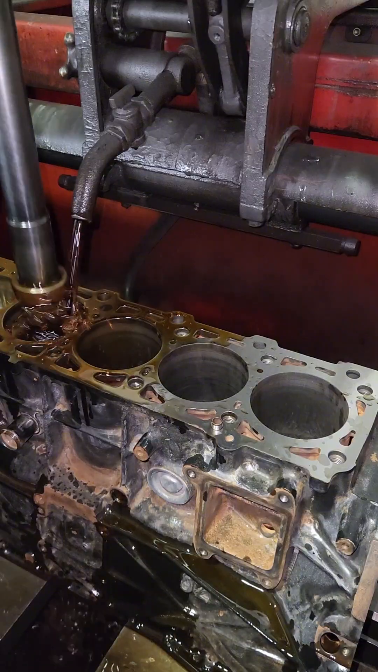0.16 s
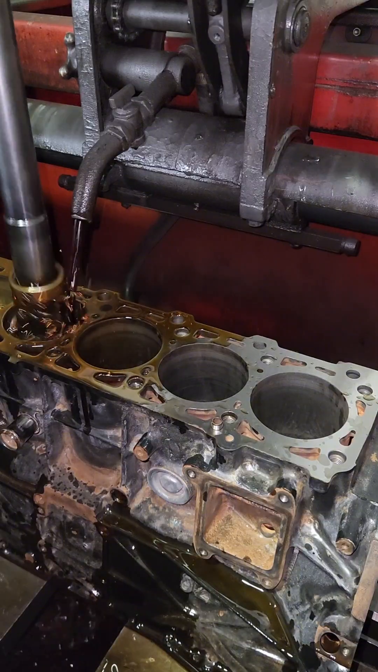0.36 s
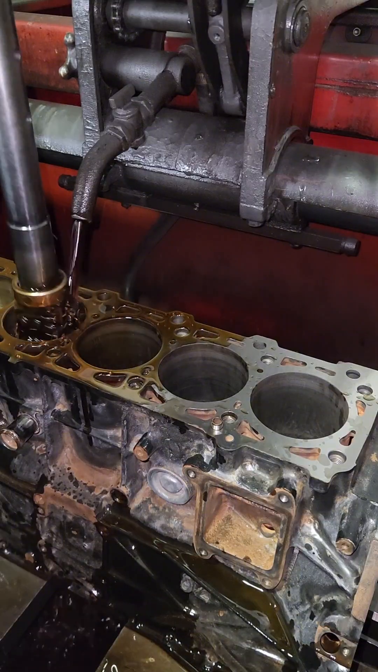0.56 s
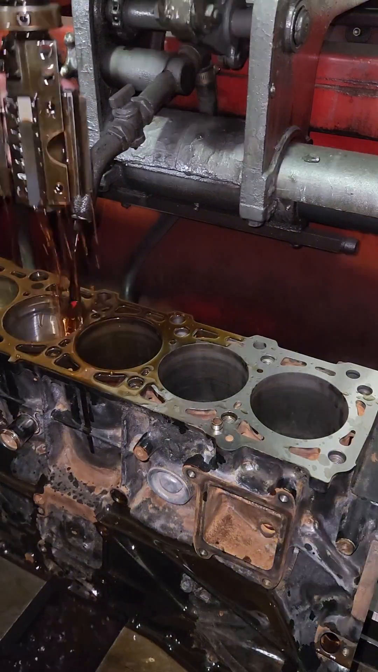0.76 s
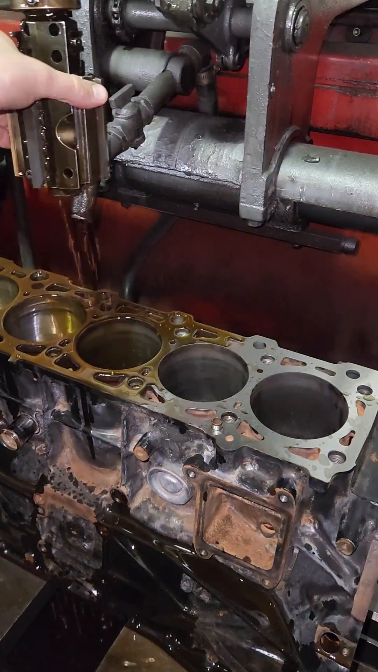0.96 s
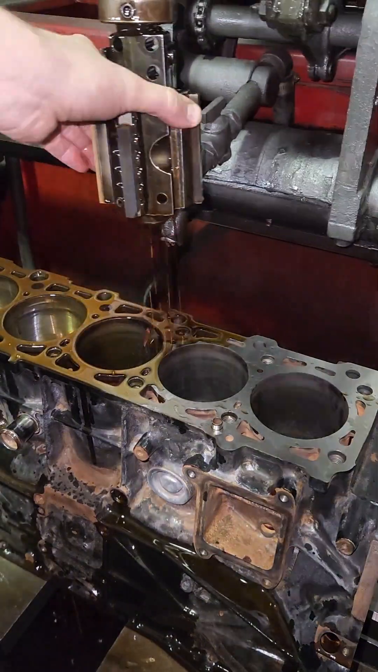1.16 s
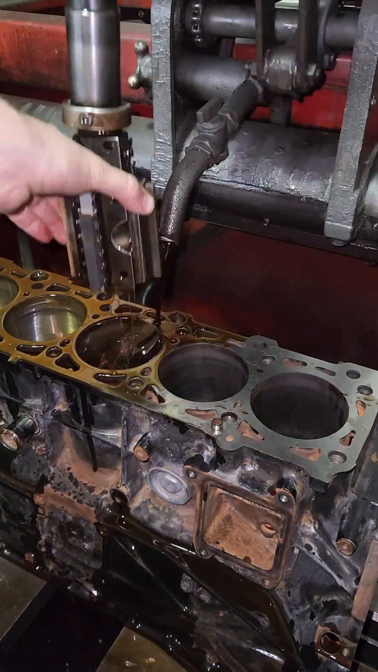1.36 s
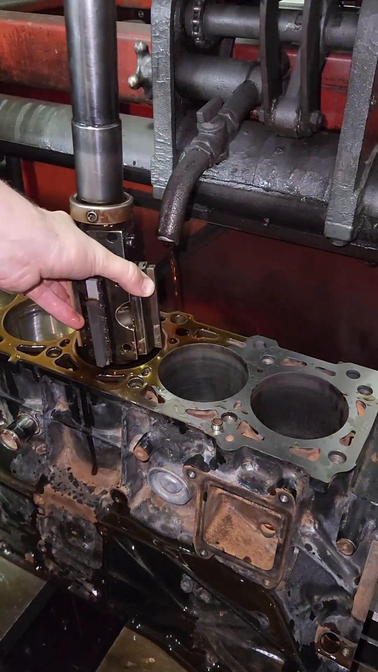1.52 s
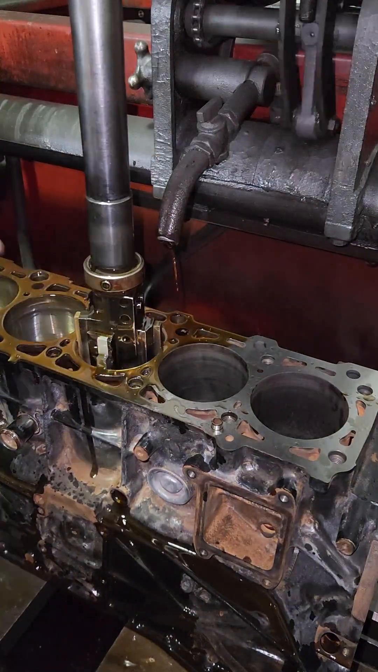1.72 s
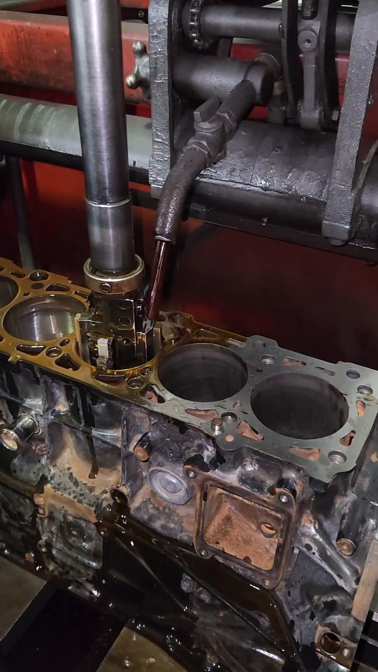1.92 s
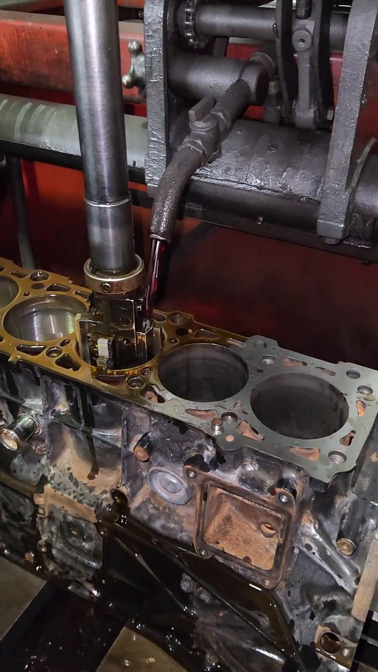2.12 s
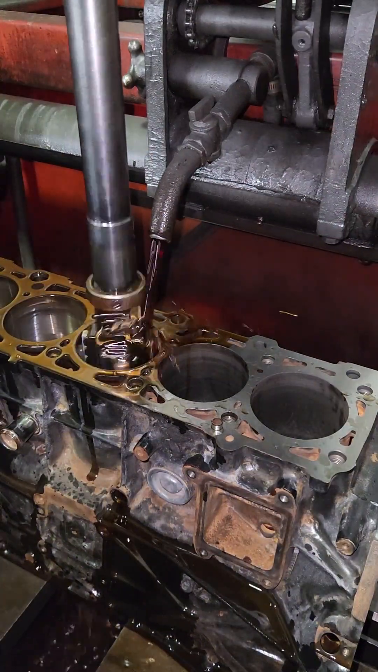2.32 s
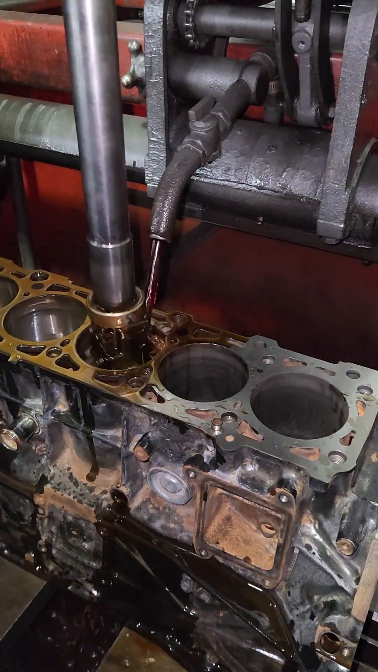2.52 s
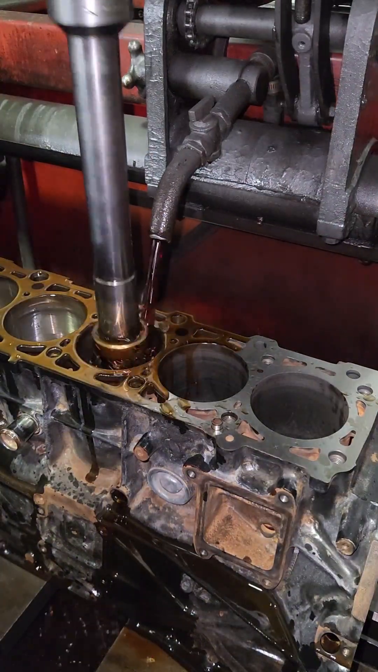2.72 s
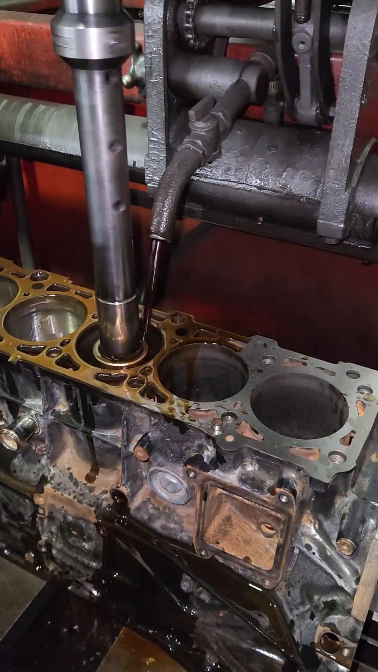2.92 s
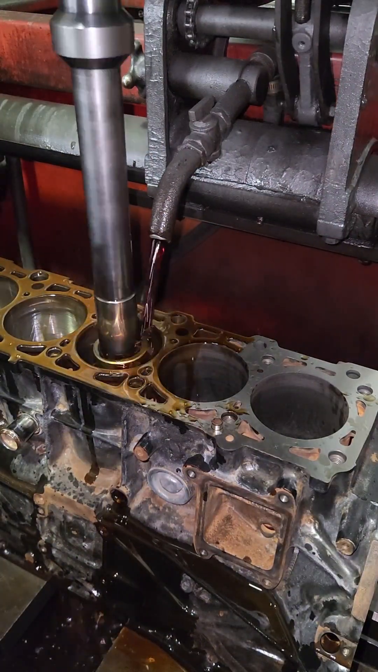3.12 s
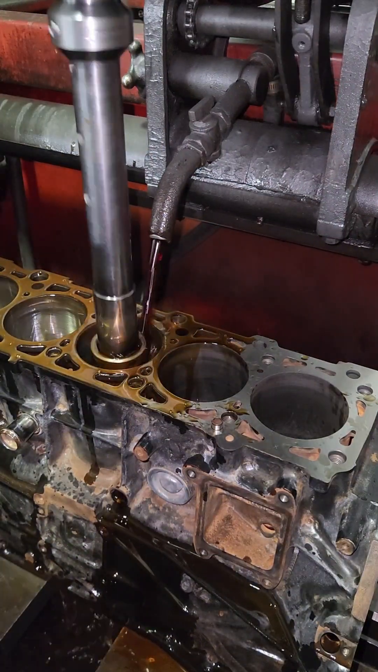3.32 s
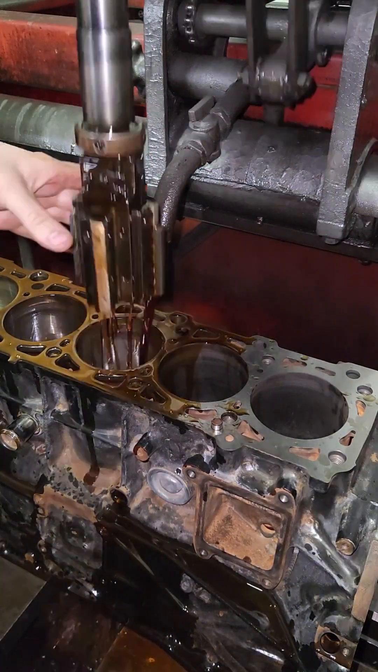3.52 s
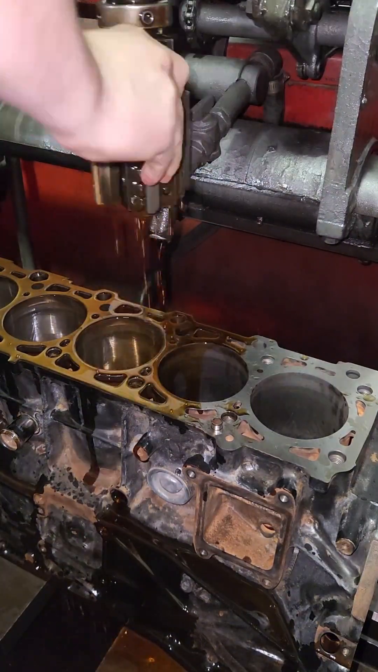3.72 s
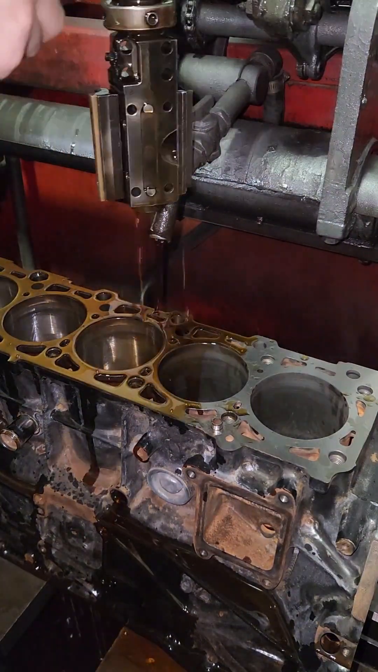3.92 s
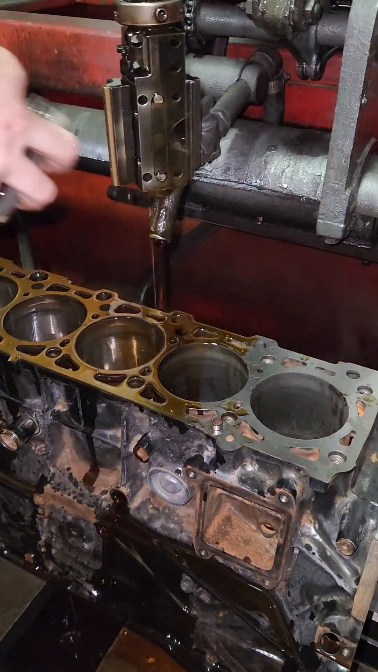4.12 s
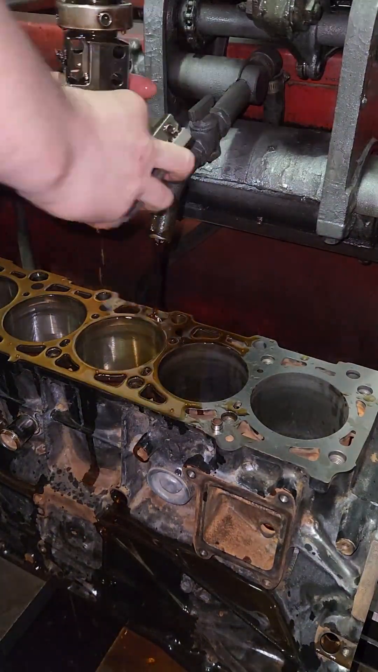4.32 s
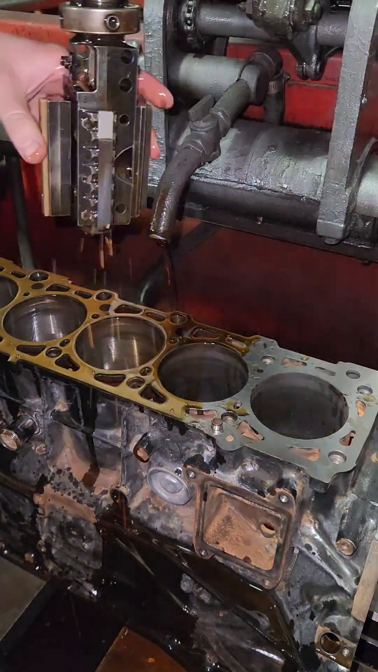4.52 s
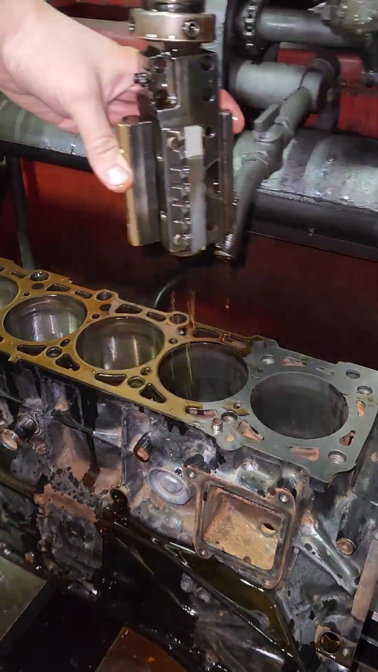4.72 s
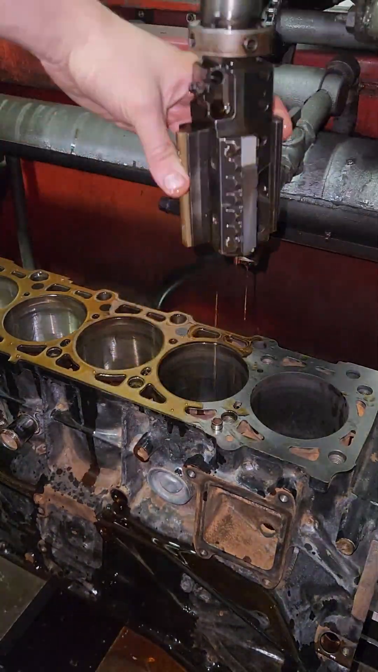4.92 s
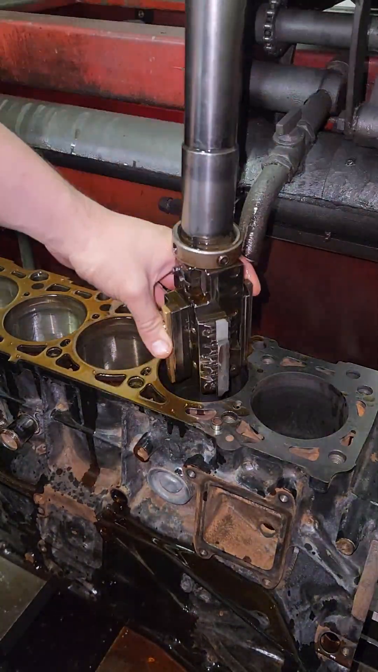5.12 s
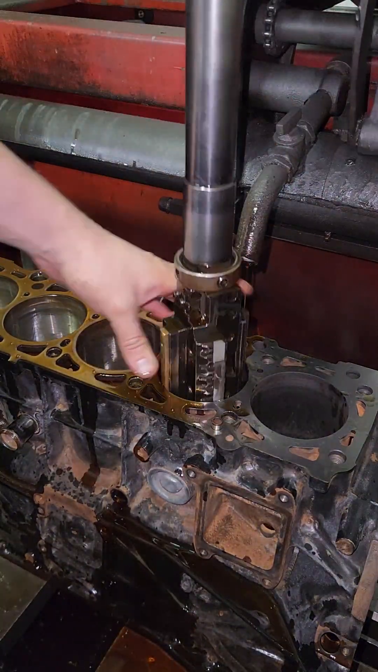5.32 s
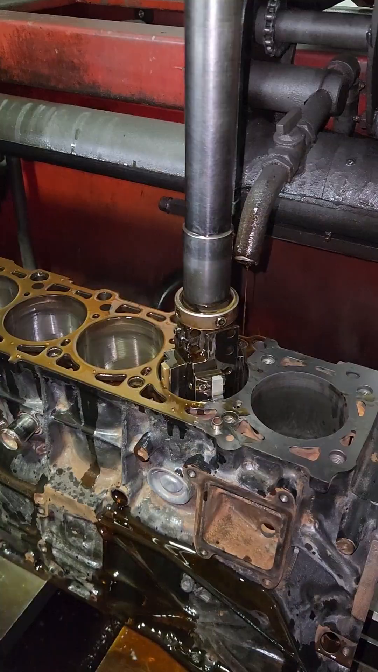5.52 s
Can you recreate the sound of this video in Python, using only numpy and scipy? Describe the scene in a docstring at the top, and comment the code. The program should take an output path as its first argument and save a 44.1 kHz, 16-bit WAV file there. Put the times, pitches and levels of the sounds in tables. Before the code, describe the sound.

A honing machine rasps and whines in short strokes on an engine block, coasts down over pattering oil, with steel knocks and clutch thumps between spells.

```python
"""A cylinder honing machine works an engine block in short spells, close by in a machine shop.
It starts in mid-spell: the frame rumbles, motor and gears whine as tones, noisy stones rub and scuff in strokes.
The clutch lets go and the drive coasts down over pattering oil; the loose hone head clicks and knocks as modes
and noise bursts, and the carriage whirrs as a hand shoves it to the next bore. The clutch thumps in, the stones
bite and squeak, the drive coasts again, more shoves and knocks follow, and the clutch grabs once more."""
import sys
import numpy as np
from scipy import signal
from scipy.fft import rfft, irfft
from scipy.io import wavfile

SR = 44100
rng = np.random.default_rng(int(sys.argv[2]) if len(sys.argv) > 2 else 0)


def digitize_waveform(pressure):
    """Quantize a signal to 16-bit integers and store it at the path in sys.argv[1].

    Rows of a 2-D input are taken as channels; values are limited to [-1, 1].
    """
    field = np.atleast_2d(pressure).T
    bounded = np.clip(field, -1, 1)
    quanta = np.round(bounded * 32767).astype(np.int16)
    wavfile.write(sys.argv[1], SR, quanta)


N = 245195
T = np.arange(N) / SR

# How much louder the left microphone port is. Each row: frequency in Hz, left minus right in dB.
PORT_SIDES = [(100, 1.76), (400, 3.1), (1300, 3), (2400, 1.2), (4600, 2.1), (6500, 11.2), (9000, 16.5),
              (12500, 10.6), (15500, 13)]
# A hand shoves the spindle along to the next bore.
# Each row: middle in seconds, half length in seconds, frame rumble in dB, whirr in dB.
SPINDLE_SHOVES = [(1.387, 0.092, -50, -46.5), (1.57, 0.071, -36.5, -49), (4.704, 0.044, -32, -70)]


def amp(db):
    """Decibels to gain."""
    return 10 ** (np.asarray(db) / 20)


def unit(x):
    """Scales to rms 1; a pair is scaled by its mid signal."""
    return x / np.sqrt(np.mean(np.atleast_2d(x).mean(0) ** 2) + 1e-20)


def read(points, hz):
    """Reads a spectrum on a log-frequency axis."""
    f, value = np.transpose(points)
    return np.interp(np.log(hz + 1), np.log(f + 1), value)


def add(mix, s, sound):
    """Mixes a sound in at second s."""
    part = mix[:, max(round(s * SR), 0):][:, :sound.shape[-1]]
    part += sound[..., :part.shape[1]]


def drift(rate_hz):
    """Smooth chance of rms 1, moving up to about the given rate."""
    hz = np.fft.rfftfreq(N, 1 / SR)
    slow = np.exp(-(hz / rate_hz) ** 2) * (hz > 0)
    return unit(irfft(rfft(rng.standard_normal(N)) * slow, N))


def swell(middle_s, half_s):
    """A smooth rise and fall around one moment."""
    return np.exp(-((T - middle_s) / half_s) ** 2)


def hump(centre_hz, octaves, skirt_db):
    """A spectrum with one rounded peak over a flat skirt."""
    hz = np.geomspace(30, 17000, 60)
    bell = np.exp(-.5 * (np.log2(hz / centre_hz) / octaves) ** 2)
    return np.column_stack([hz, 20 * np.log10(bell + amp(skirt_db))])


def ports(pair, colour):
    """Colours two unrelated signals and spreads them over the ports: bass alike, treble mostly left."""
    # Likeness of the two ports. Each row: frequency in Hz, likeness (held to 0-1 below).
    port_likeness = [(100, 1.5), (300, 0.83), (600, 1), (1200, -0.7), (2400, 0.11), (15000, -0.9)]
    size = pair.shape[1]
    hz = np.fft.rfftfreq(size, 1 / SR)
    a, b = rfft(pair)
    same = np.clip(read(port_likeness, hz), 0, 1)
    right = amp(-read(PORT_SIDES, hz))
    spread = np.array([a, right * (same * a + np.sqrt(1 - same ** 2) * b)])
    mid_gain = np.sqrt(1 + right ** 2 + 2 * same * right)
    return unit(irfft(spread * amp(read(colour, hz)) / mid_gain, size))


def noise(colour, size=N):
    """Coloured noise at both ports."""
    return ports(rng.standard_normal((2, size)), colour)


def grains(per_s, spread_db):
    """Sparse tiny impacts of uneven size."""
    size = amp(spread_db * np.minimum(rng.exponential(1, N), 4))
    landed = rng.random(N) < per_s / SR
    return unit(size * landed * rng.standard_normal((2, N)))


def burst(colour, rise, t60, size=8192):
    """Noise that swells quickly and dies away, its envelope peaking at 1; times in seconds."""
    t = T[:size]
    shape = (1 - np.exp(-t / rise)) * amp(-60 * t / t60)
    return noise(colour, size=size) * shape / shape.max()


def tone(hz, rough, width_hz, lead):
    """A machine line: a clean core with a fuzzy skirt; the left port leads by some radians."""
    rough = np.clip(rough, 0, 1)
    turn = np.exp(2j * np.pi * np.cumsum(hz) / SR)
    fuzz = (drift(width_hz) + 1j * drift(width_hz)) / np.sqrt(2)
    line = turn * (np.sqrt(1 - rough) + np.sqrt(rough) * fuzz)
    right = line * np.exp(-1j * lead) * amp(-read(PORT_SIDES, hz.max()))
    return unit(np.array([line, right]).real)


def spell():
    """At each moment: seconds since clutch in, stones' bite and clutch out; then the hum and whine levels."""
    # Spells of work. Each row: clutch in, stones bite and clutch out in seconds,
    # then motor hum, 4th and 5th tooth harmonic in dB before each source's own trim.
    work_spells = [(-1, -0.5, 0.645, -32.5, -30.7, -33.6), (1.812, 2.42, 3.45, -27.6, -38.3, -32),
                   (5.441, 6, 7, -30, -42, -41)]
    rows = np.array(work_spells)
    start, bite, stop, *levels = rows[np.searchsorted(rows[1:, 0], T)].T
    return (*np.maximum(T - np.array([start, bite, stop]), 0), *levels)


def running(rise_s, fade_db_per_s, hold_s=0):
    """An envelope that rises with the clutch, stays through the spell and fades after it."""
    engaged, _, released = spell()[:3]
    return (1 - np.exp(-engaged / rise_s)) * amp(-fade_db_per_s * np.maximum(released - hold_s, 0))


def speed():
    """Speed of the drive, 1 at work: it picks up quickly and sags once the clutch lets go."""
    slip, spin_up_s, coast_s = 0.14, 0.04, 0.7  # share of speed missing at the grip, two time constants
    engaged, _, released = spell()[:3]
    return (1 - slip * np.exp(-engaged / spin_up_s)) * np.exp(-released / coast_s)


def pressure():
    """How hard the stones press: 0 while loose, 1 once they bite, until the next clutch-in."""
    return 1 - np.exp(-spell()[1] / 0.011)


def frame():
    """The heavy frame drones at its resonance over a broad rumble, and keeps shaking as the drive coasts."""
    # Each row: frequency in Hz, relative level in dB per Hz.
    rumble_colour = [(10, -17), (25, -10.5), (45, -6), (62, -3), (82, -4.5), (102, -4), (130, -12),
                     (200, -22.5), (350, -28), (800, -43), (2000, -62)]
    shake_hz, shake_db, rest_db = 78.25, -20, -44.5
    drone_hz = shake_hz * (0.9 + 0.1 * speed() + 0.0819 * drift(10.12))
    drone = tone(drone_hz, rough=0.11, width_hz=24, lead=0)
    shaking = amp(-2) * drone + noise(rumble_colour)
    # the shaking is driven, so its strength stays steady from one moment to the next
    power = signal.fftconvolve(shaking[0] ** 2, signal.windows.hann(M=4001), "same")
    steady = unit(shaking / np.sqrt(power))
    driven = amp(shake_db) * running(rise_s=0.007, fade_db_per_s=26, hold_s=0.16)
    shoved = sum(amp(db) * swell(s, half_s) for s, half_s, db, _ in SPINDLE_SHOVES)
    return np.hypot(driven + shoved, amp(rest_db)) * amp(1.2 * drift(8.1)) * steady


def motor():
    """The loaded motor hums with an unsteady pitch, loudest just as the clutch grips."""
    hum_hz, surge_db, surge_s = 354.3, 8, 0.03  # the surge dies away with this time constant
    engaged, _, _, hum_db, _, _ = spell()
    db = hum_db - 0.3 + surge_db * np.exp(-engaged / surge_s) + 1.1 * drift(8)
    hz = hum_hz + 7 * drift(7) + 7 * drift(41.5)
    hum = tone(hz, rough=0.4, width_hz=78, lead=0.24)
    return amp(db) * running(rise_s=0.0052, fade_db_per_s=223) * hum


def gears():
    """Tooth harmonics whine and sag as the clutch lets go; backlash smears the fourth where it is weak."""
    mesh_hz = 329.8  # gear teeth meeting at full speed
    fourth_db, fifth_db = spell()[-2:]
    fourth_hz, fifth_hz, sixth_hz = np.outer([4, 5, 6], mesh_hz * speed())
    wobble = 1 + .0045 * drift(16.5)
    smear = np.interp(fourth_db, [-40, -33], [.95, .15])
    fourth = amp(fourth_db - 0.5) * tone(fourth_hz * wobble, rough=smear, width_hz=58, lead=0.97)
    # backlash rocks the phase of the fifth harmonic
    rocked_hz = fifth_hz * wobble + 12 * drift(67)
    fifth = amp(fifth_db) * tone(rocked_hz, rough=0.54, width_hz=116, lead=-0.94)
    sixth = amp(fifth_db - 15.5) * tone(sixth_hz * wobble, rough=0.86, width_hz=54, lead=0.35)
    # squaring doubles the fade rate in dB
    return running(rise_s=0.062, fade_db_per_s=69) ** 2 * (fourth + fifth + sixth)


def stones():
    """Grit rubs the oiled bore as noise and grains, harder once the stones bite; the level flutters."""
    # Each row: frequency in Hz, relative level in dB per Hz.
    rub_colour = [(60, -24), (150, 7), (300, 8.5), (470, 5.5), (720, 3.5), (1000, 0), (1450, 1),
                  (1900, -5.5), (3300, -8), (5000, -10), (7800, -12.5), (9400, -26.5), (12200, -13),
                  (15800, -18.5)]
    loose_db, pressed_db, tail_db = -31.5, -26.5, -40.5  # spinning loose, on the bore, drawn out
    grit = rng.standard_normal((2, N)) + 0.33 * grains(per_s=2000, spread_db=3.0)
    rub_level = amp(loose_db + (pressed_db - loose_db) * pressure())
    rub = rub_level * running(rise_s=0.0025, fade_db_per_s=123, hold_s=0.0095)
    tail = amp(tail_db) * running(rise_s=0.006, fade_db_per_s=30)
    return np.maximum(rub, tail) * amp(0.93 * drift(58)) * ports(grit, rub_colour)


def oil():
    """Oil patters in an uneven trickle, fuller while the head spins; the loose head also throws spray."""
    # Patter on the block. Each row: frequency in Hz, relative level in dB per Hz.
    wash_colour = [(60, -9), (130, -3), (280, -11), (450, -14), (700, -17.5), (1000, -18.5), (1300, -18.5),
                   (1900, -21.5), (2700, -19), (4200, -19.5), (7700, -28.5), (9400, -46), (11000, -39),
                   (12300, -33.5), (16000, -45)]
    # Fine spray off the spinning head. Each row: frequency in Hz, relative level in dB per Hz.
    spray_colour = [(200, 14), (700, 4), (2000, -9), (4200, -11), (7700, 1), (9400, -13), (12300, -6),
                    (16000, -5)]
    trickle_db, flow_db, spray_db = -47, -42.5, -37.5
    patter = rng.standard_normal((2, N)) + 0.38 * grains(per_s=400, spread_db=2.5)
    # after a spell the flow drains off the head
    flow = amp(trickle_db) + amp(flow_db) * running(rise_s=0.06, fade_db_per_s=10.5)
    spray = amp(spray_db) * (1 - pressure()) * running(rise_s=0.1, fade_db_per_s=100)
    return flow * amp(1.7 * drift(27)) * ports(patter, wash_colour) + spray * noise(spray_colour)


def splashes(count=30):
    """Clumps of oil drops land on the block, each a few cycles of a high note; they fade as the head drains."""
    # Colour of the drops. Each row: frequency in Hz, relative level in dB.
    drop_colour = [(2200, -20), (3200, -4), (4300, 1), (5800, 2.5), (7700, 3), (9400, -11), (12500, 0),
                   (15000, 0)]
    # Gushes of oil off the lifted head. Each row: middle in seconds, level in dB.
    oil_gushes = [(0.77, -39.5), (1.08, -52), (3.58, -43.5), (3.8, -44.5), (4.0, -42), (4.72, -48)]
    gush_s, drip_db = 0.071, -51  # half length of a gush, level of the drips
    out, t = np.zeros((2, N)), T[:512]
    clump = amp(6.5 * drift(24))
    for hz in np.geomspace(2400, 14500, count):
        cycles = hz * t
        note = np.sin(2 * np.pi * cycles) * cycles * np.exp(-cycles / 5.5)
        drop = amp(read(drop_colour, hz)) * unit(note)
        landings = (rng.random(N) < 60 * clump / SR) * rng.standard_normal((2, N))
        out += signal.oaconvolve(landings, drop[None])[:, :N] * amp([[0], [-read(PORT_SIDES, hz)]])
    gushes = sum(amp(db) * swell(s, gush_s) for s, db in oil_gushes)
    drips = amp(drip_db) * running(rise_s=0.035, fade_db_per_s=3.0)
    return np.hypot(gushes, drips) * unit(out)


def air():
    """The steady air of the shop, a quiet coloured noise."""
    # Each row: frequency in Hz, relative level in dB per Hz.
    air_colour = [(70, 9), (200, -3), (450, -0.5), (720, 1), (930, 1.5), (1200, -15), (1420, 0),
                  (1800, -15.5), (4000, -41)]
    return amp(-50.0) * noise(air_colour)


def strokes():
    """Each stroke is a hollow rasp of the bore, then a double scuff as the stones turn round; some squeak."""
    # Strokes of the head. Each row: scuff in seconds, scuff in dB, bump in dB, both before trim.
    head_strokes = [(0.168, -18.5, -27), (0.357, -15, -21), (0.5566, -18.5, -21.5), (0.75, -34, -23),
                    (2.505, -17, -17), (2.7487, -19.5, -18.5), (2.965, -15.5, -17.5),
                    (3.1632, -15.5, -22.5), (3.358, -17, -21.5), (3.558, -30.5, -24)]
    # Squeaks of the stones in the bore. Each row: start in seconds, level in dB before trim.
    stone_squeaks = [(2.4228, -23), (2.4354, -25), (2.5513, -18), (2.6749, -25), (2.7793, -14.5)]
    # Colours of scuff and squeak. Each row: frequency in Hz, relative level in dB per Hz.
    scuff_colour = [(1500, -21), (2600, -4), (3300, 3.5), (3900, 2.5), (4600, 3.5), (5800, -6),
                    (7500, -9.5), (9400, -30), (10500, -7), (11600, -16)]
    squeal_colour = [(11000, -51), (13500, -17), (14700, -12), (15300, 2), (15700, 0), (16500, -10)]
    bump_lead_s, bump_hz, rebound_s, rebound_db = 0.053, 625, 0.011, -5.5
    out = np.zeros((2, N))
    bore = hump(bump_hz, octaves=0.47, skirt_db=-30.5)
    for s, scuff_db, bump_db in head_strokes:
        add(out, s - bump_lead_s, amp(bump_db - 5) * burst(bore, rise=0.0074, t60=0.067))
        for delay, db in [(0, scuff_db), (rebound_s, scuff_db + rebound_db)]:
            add(out, s + delay, amp(db - 5.5) * burst(scuff_colour, rise=0.0027, t60=0.043))
    for s, db in stone_squeaks:
        add(out, s, amp(db + 0.5) * burst(squeal_colour, rise=0.0011, t60=0.037))
    return out


def ring(size=8192):
    """The modes of the hone head, decaying sines struck in different phases each time."""
    # Each row: frequency in Hz, relative level in dB, t60 in seconds.
    head_modes = [(2200, -6, .06), (2846, 2, 0.021), (3420, -30, .06), (4220, 26, 0.15), (4600, 13, .06),
                  (5570, -17, 0.022), (5820, -8, .04), (6800, -2, .04)]
    hz, db, t60 = np.transpose(head_modes)[:, :, None]
    t = T[:size]
    phase = 2 * np.pi * rng.random((2, len(head_modes), 1))
    modes = amp(db - 60 * t / t60) * np.sin(2 * np.pi * hz * t + phase)
    modes[1] *= amp(-read(PORT_SIDES, hz))
    return modes.sum(1) / np.linalg.norm(amp(db))


def clicks():
    """Steel knocks on steel: a short crack, a brief ring of the head and a scatter off the machine."""
    # Each row: start in seconds, level in dB before the layer trims, centre in Hz,
    # spread in octaves, t60 of the crack in seconds.
    steel_knocks = [(0.624, -20, 3840, 0.17, 0.014), (0.7035, -16, 5400, 0.4, 0.013),
                    (0.995, -26, 1270, 0.81, 0.02), (1.7194, -25.5, 1230, 1.3, 0.026),
                    (1.7472, -10, 3760, 0.9, 0.031), (1.788, -26, 1590, 0.9, 0.06),
                    (1.805, -17, 4530, 0.94, 0.068), (2.191, -26.5, 5100, 0.2, 0.03),
                    (3.7105, -28, 1390, 1.7, 0.039), (4.188, -22, 3810, 0.49, 0.02),
                    (4.199, -21, 3790, 0.47, 0.025), (4.3185, -19, 4700, 0.19, 0.025),
                    (4.392, -19, 3300, 0.8, 0.027), (4.4086, -24, 2960, 0.71, 0.014),
                    (4.4647, -13, 3720, 0.64, 0.015), (5.0298, -34.5, 2890, 0.39, 0.027),
                    (5.3594, -25, 1870, 0.84, 0.031), (5.3795, -10.5, 2350, 1.47, 0.042),
                    (5.406, -19.5, 3400, 0.99, 0.052)]
    # Tilt of every crack. Each row: frequency in Hz, relative level in dB per Hz.
    crack_colour = [(200, 17), (900, 10), (2500, 3), (5800, 2.5), (7500, -5.5), (9500, -15), (12000, -5.5),
                    (16000, -10)]
    out = np.zeros((2, N))
    for s, db, centre_hz, octaves, t60 in steel_knocks:
        peak = hump(centre_hz, octaves, skirt_db=-22.5)
        colour = [(hz, level + read(crack_colour, hz)) for hz, level in peak]
        crack = burst(colour, rise=0.00029, t60=t60)
        scatter = burst(colour, rise=0.0035, t60=0.047)
        add(out, s, amp(db) * (amp(-2.5) * crack + amp(-14.5) * scatter + amp(-31) * ring()))
    return out


def thumps(count=3):
    """Clutch and linkage shove the frame: a damped swing and a dull rattle."""
    # Dull blows on frame and linkage. Each row: start in seconds, level in dB before trim, pitch in Hz.
    frame_blows = [(1.074, -18.5, 183), (1.108, -20.5, 238), (1.723, -16, 109), (1.749, -10, 296),
                   (2.414, -14.5, 260), (3.711, -21, 110), (4.686, -25, 150), (5.318, -20, 264),
                   (5.362, -14, 197), (5.381, -14.5, 557)]
    # The clutch grabs. Each row: first blow in seconds, level in dB before trim, pitch in Hz.
    clutch_grabs = [(1.816, -9, 336), (5.444, -9.5, 97)]
    judder_s = 0.0095  # time between the quick blows of a grab
    rattle_colour = [(40, 5.5), (120, 2.5), (340, 2), (700, -3.0), (1500, -17.5), (4000, -40.5)]  # Hz, dB
    out, t = np.zeros((2, N)), T[:8192]
    judder = [(s + k * judder_s, db, hz) for s, db, hz in clutch_grabs for k in range(count)]
    for s, db, hz in frame_blows + judder:
        swing = np.sin(2 * np.pi * hz * t) * amp(-60 * t / 0.042) * (1 - np.exp(-t / 0.00083))
        rattle = burst(rattle_colour, rise=0.0015, t60=0.047)
        add(out, s, amp(db) * (amp(-0.5) * swing + amp(-8.5) * rattle))
    return out * amp(0) * np.array(amp([[.6], [-.6]]))  # left a little louder


def carriage():
    """The spindle carriage gives a soft, blurred whirr as it is shoved along."""
    whirr_hz = 1530
    level = sum(amp(db) * swell(s, half_s) for s, half_s, _, db in SPINDLE_SHOVES)
    return level * tone(np.full(N, whirr_hz), rough=0.96, width_hz=320, lead=0.97)


def shop(x, t60=0.31, size=16384):
    """A faint diffuse tail from the walls, made by convolving with a decaying noise."""
    wall_colour = [(100, 15), (1000, 5.0), (5000, -4.5), (15000, -18)]  # Hz, dB
    tail = burst(wall_colour, rise=0.0049, t60=t60, size=size)
    level = np.linalg.norm(tail, axis=1, keepdims=True)
    return signal.fftconvolve(x, tail / level, axes=1)[:, :N]


def scene():
    """The running machine, the oil and the knocks, in the air of the shop."""
    machine = frame() + motor() + gears() + stones() + carriage()
    hits = strokes() + clicks() + thumps()
    return machine + oil() + splashes() + air() + hits + amp(-16) * shop(hits)


def record(dry):
    """Peaks stop at full scale; then the band limit."""
    edge_hz = 15900
    held = np.clip(dry, -1, 1)
    low_pass = signal.firwin(401, edge_hz, window=("kaiser", 8), fs=SR)
    return signal.oaconvolve(held, low_pass[None], "same")


dry = scene()
out = record(dry)
digitize_waveform(out)
```